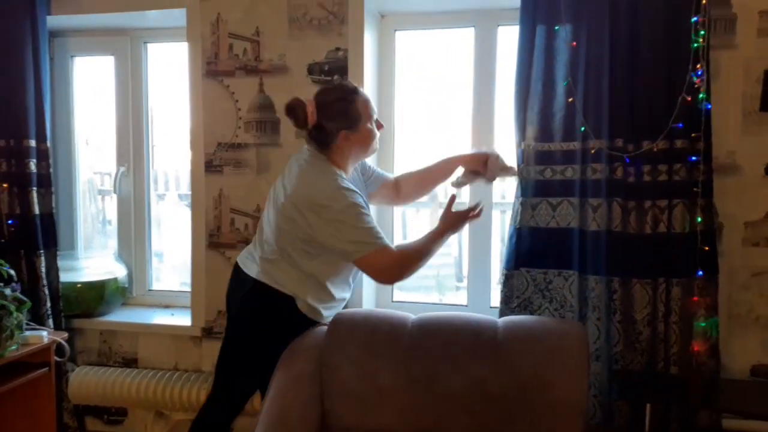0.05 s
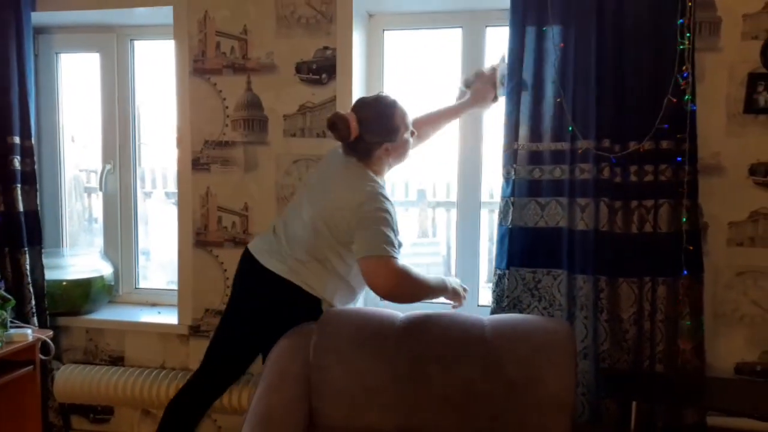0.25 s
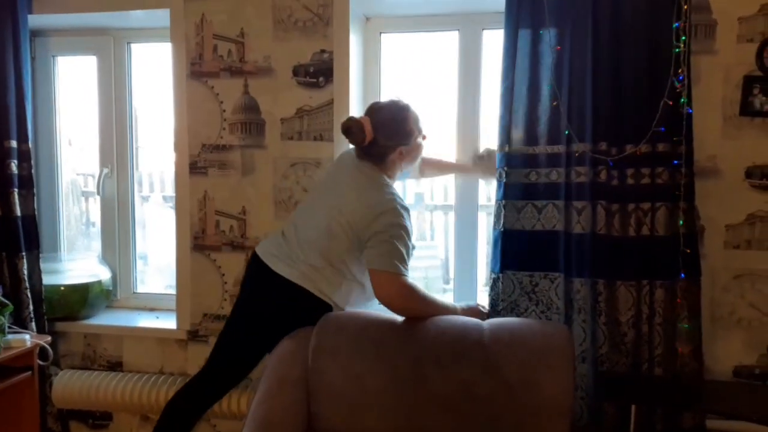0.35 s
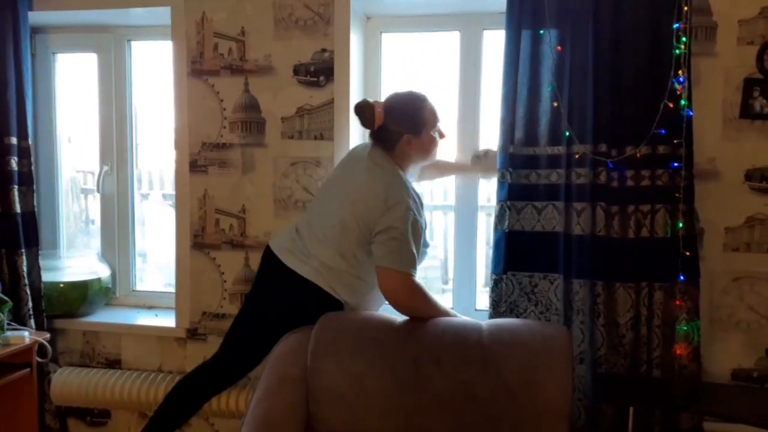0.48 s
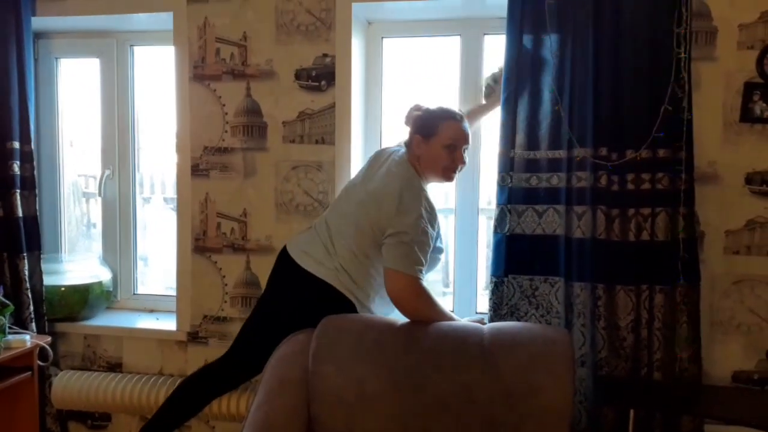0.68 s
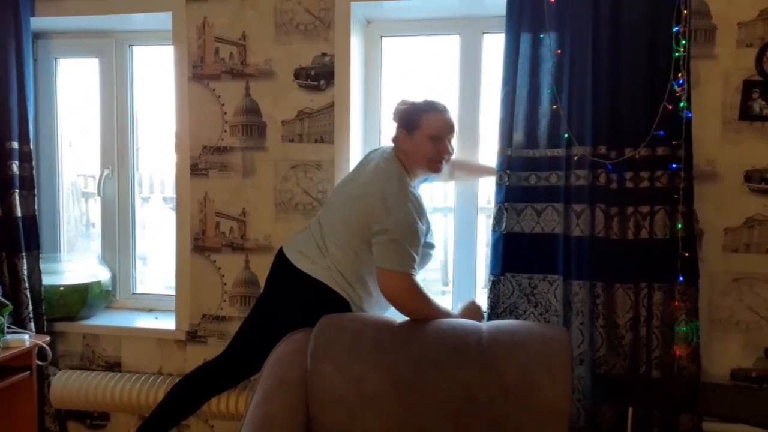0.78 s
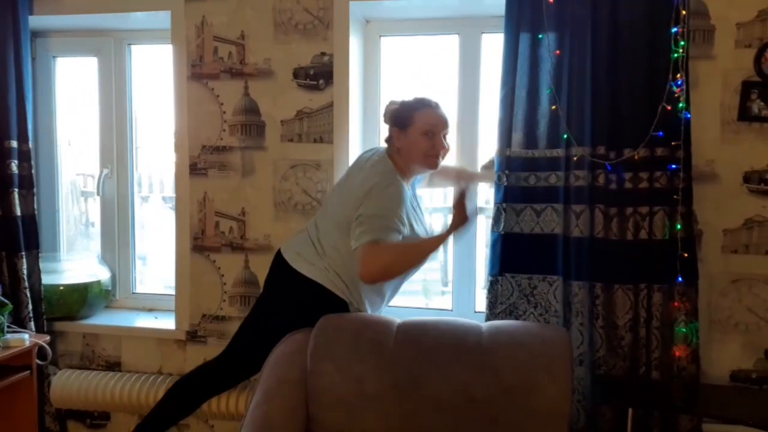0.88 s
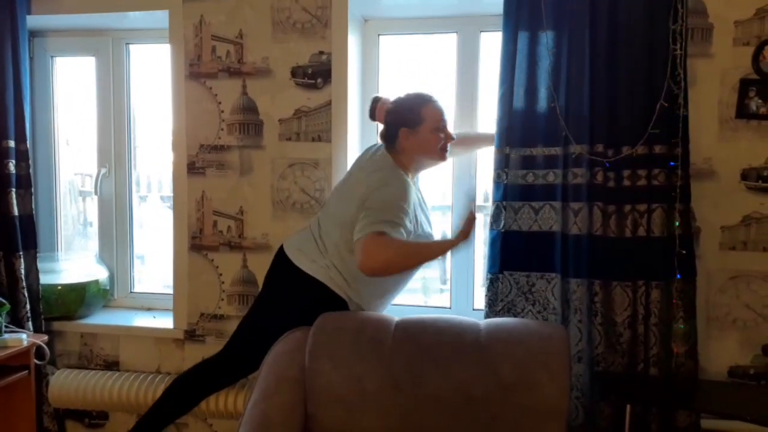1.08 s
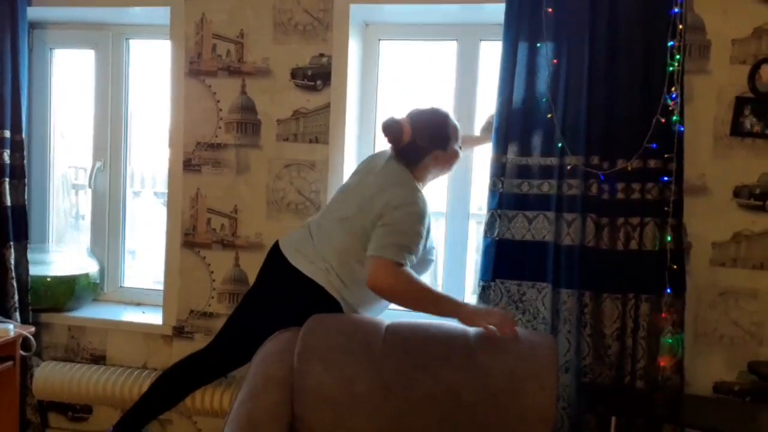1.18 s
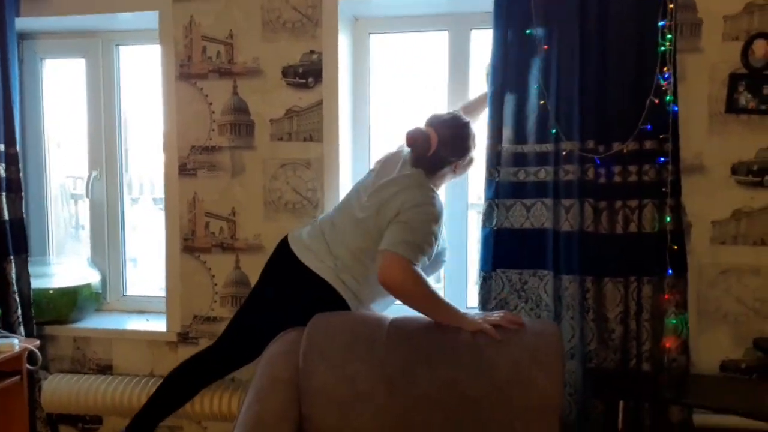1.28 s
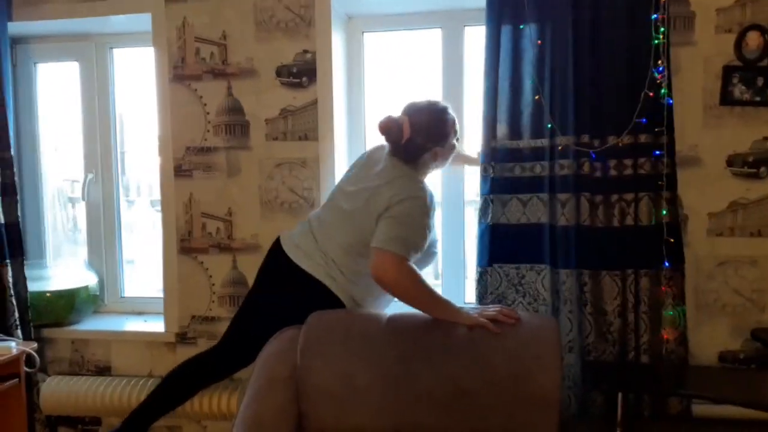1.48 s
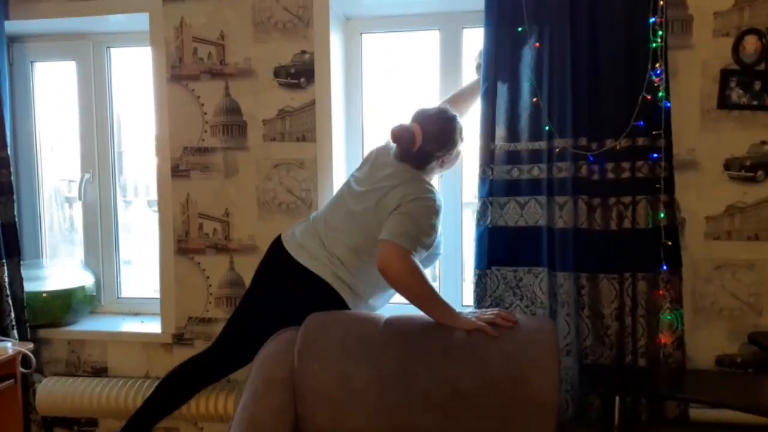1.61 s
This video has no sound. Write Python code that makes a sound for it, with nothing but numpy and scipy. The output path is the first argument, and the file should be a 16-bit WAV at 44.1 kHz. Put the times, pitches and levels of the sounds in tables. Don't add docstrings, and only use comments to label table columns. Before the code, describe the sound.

Crumpled newspaper rubbed hard on window glass in quick strokes, rustling, with short rubbery squeaks

```python
import sys
import numpy as np
from scipy import signal
from scipy.fft import rfft, irfft
from scipy.io import wavfile

SR = 44100
rng = np.random.default_rng(int(sys.argv[2]) if len(sys.argv) > 2 else 0)


def volts(x):
    e = np.asarray(x, float) / 20
    return 10 ** e


def store_wav(level_fs):
    pcm = np.round(np.clip(np.atleast_2d(level_fs), -1, 1) * 32767)
    wavfile.write(sys.argv[1], SR, pcm.T.astype(np.int16))


N = 72765


def at_hz(points, hz):
    f, v = np.transpose(points)
    return np.interp(np.log(hz), np.log(f), v)


def bin_hz():
    return np.maximum(np.fft.rfftfreq(N, 1 / SR), 1)


def rms_one(x):
    return x / np.sqrt(np.mean(x ** 2) + 1e-20)


def drift(rate_hz):
    r = np.exp(-2 * np.pi * rate_hz / SR)
    noise = rng.standard_normal(N + SR)
    return rms_one(signal.lfilter([1], [1, -2 * r, r * r], noise)[SR:])


def colour(x, points):
    return irfft(rfft(x) * volts(at_hz(points, bin_hz())), N)


def swells(rows):
    t = np.arange(N) / SR
    return sum(volts(db) * np.sin(np.interp(t, [start, peak, end], [0, np.pi / 2, 0])) ** 2
               for start, peak, end, db in rows)


def resonance(x, hz, width):
    r = np.exp(-np.pi * width / SR)
    gain = (1 - r * r) * np.sqrt(SR / width / (2 * np.pi))
    return gain * signal.lfilter([1, 0, -1], [1, -2 * r * np.cos(2 * np.pi * hz / SR), r * r], x)


# (frequency [Hz], correlation [-1 to 1])
STEREO_LIKENESS = [(300, 0.85), (700, 0.56), (1400, 0.14), (2800, 1), (6000, -0.084), (12000, 0.42)]


def spread(mid, side):
    likeness = np.clip(at_hz(STEREO_LIKENESS, bin_hz()), -1, 1)
    shared = np.sqrt(1 + likeness) * rfft(mid)
    opposed = np.sqrt(1 - likeness) * rfft(side) * [[1], [-1]]
    return irfft(shared + opposed, N) / np.sqrt(2)


# (frequency [Hz], level [dB per Hz])
ROOM_TONE = [(40, -27), (300, -15.5), (2200, 0), (5000, -9.5), (10000, -17), (15800, -21)]


def room_tone():
    mid, side = (rms_one(colour(rng.standard_normal(N), ROOM_TONE)) for _ in "ms")
    return volts(-68.5) * spread(mid, side)


def friction(clump_db):
    grains_per_s, grain_spread_db, grain_share = 2200, 4, 0.45
    sizes = volts(grain_spread_db * np.minimum(rng.exponential(1, N), 4)) * rng.choice([-1, 1], N)
    clicks = sizes * (rng.random(N) < grains_per_s * volts(clump_db) / SR)
    return np.sqrt(grain_share) * rms_one(clicks) + np.sqrt(1 - grain_share) * rng.standard_normal(N)


# (frequency [Hz], level [dB per Hz])
PAPER_SPECTRUM = [(250, -61), (420, -14), (662, -1.5), (1060, -6), (1270, 0), (1980, -2.5), (5800, -8),
                  (10300, -24), (15800, -19.5)]
# (start [s], peak [s], end [s], rustle level [dB], treble lift [dB])
STROKES = [(-.08, 0.043, .13, -53.5, 3.1), (.1, 0.157, 0.23, -65, -2.1), (0.195, 0.248, .29, -46.5, 1.3),
           (0.247, .3, 0.39, -51, 1.5), (0.34, 0.392, 0.49, -58.5, 1), (0.419, 0.443, 0.52, -55, -4.5),
           (0.468, 0.5, 0.58, -55.5, 0.5), (0.526, 0.625, 0.81, -58.5, 1.5),
           (0.633, 0.709, 0.74, -57.5, -25), (0.731, 0.781, 0.84, -63.5, 4.5),
           (0.787, 0.866, 1.016, -69, -7), (0.949, 1.017, 1.183, -67.5, 1), (1.05, 1.124, 1.17, -59.5, -12),
           (1.126, 1.189, 1.254, -60.5, -12), (1.22, 1.301, 1.338, -52.5, -7),
           (1.298, 1.347, 1.383, -44, 3), (1.348, 1.392, 1.496, -56.5, 4), (1.433, 1.515, 1.62, -67, -13),
           (1.522, 1.613, 1.65, -66, 5.5), (1.593, 1.663, 1.89, -56.5, -1), (0.181, 0.204, 0.22, -61, 4),
           (0.533, 0.555, .6, -67.5, 5)]


def rustle():
    clump_db = 2.6 * drift(40)
    paper = spread(*(rms_one(colour(friction(clump_db), PAPER_SPECTRUM)) for _ in "ms"))
    treble = signal.sosfiltfilt(signal.butter(2, 7000, "high", fs=SR, output="sos"), paper)
    body = swells([row[:4] for row in STROKES]) * (paper - treble)
    air = swells([(start, peak, end, db + lift_db) for start, peak, end, db, lift_db in STROKES]) * treble
    flutter_db = 1.0 * drift(45)
    return volts(8.5 + flutter_db) * (body + air)


# (frequency [Hz], width [Hz], level [dB])
PANE_MODES = [(231.8, 115, -6), (306.7, 67.6, -4), (655, 140, -15), (1193, 170, -14.5)]
# (start [s], peak [s], end [s], hum level [dB])
PUSHES = [(0, .08, 0.14, -57), (.14, .18, 0.26, -54.5), (.19, .24, 0.3, -45.5), (.25, .294, 0.37, -49.5),
          (.41, .445, 0.48, -49), (.46, .49, 0.6, -53), (.595, .614, 0.69, -52), (.74, .77, 0.9, -70.5),
          (.8, .86, 0.87, -66.5), (.981, .995, 1.06, -47), (1.01, 1.04, 1.085, -58),
          (1.095, 1.13, 1.196, -54), (1.2, 1.265, 1.28, -52), (1.28, 1.33, 1.406, -50.5),
          (1.465, 1.485, 1.43, -56), (1.61, 1.635, 1.79, -55)]


def pane():
    pane_db, lump_db, idle_db = 5.5, -0.5, -75.5
    frame_db, frame_lump_db = -73.5, 5.0
    pressure = (swells(PUSHES) + volts(idle_db)) * volts(lump_db * drift(33))
    push = pressure * rng.standard_normal((2, N))
    modes = 0
    for hz, width, db in PANE_MODES:
        ring = resonance(resonance(push, hz, width), hz, 2 * width)
        modes = modes + volts(db) * ring * np.sqrt(width / SR)
    frame = signal.sosfilt(signal.butter(3, 130, fs=SR, output="sos"), rng.standard_normal((2, N)))
    rumble = volts(frame_db + frame_lump_db * drift(20)) * rms_one(frame)
    mid, side = volts(pane_db) * modes + rumble
    return spread(mid, side)


# (time [s], length [s], frequency [Hz], width [Hz], rms level [dB])
SCUFFS = [(.15, 0.021, 2820, 600, -55.5), (0.277, 0.056, 1290, 290, -42), (0.366, 0.035, 1700, 300, -50),
          (0.41, 0.082, 706, 143.5, -48), (0.651, 0.046, 3360, 600, -52), (.685, 0.077, 5110, 629.6, -47.5),
          (1.1, 0.045, 3500, 494, -53), (1.107, 0.041, 6800, 690, -69), (1.158, 0.031, 2400, 397, -57),
          (1.167, 0.034, 2950, 268, -57), (1.17, 0.11, 3630, 470, -60.5), (1.203, 0.049, 1720, 200, -64.5),
          (1.286, 0.03, 4360, 700, -51.5), (1.333, 0.074, 3920, 370.4, -43), (1.369, 0.046, 3500, 460, -43),
          (1.468, .046, 1490, 298, -56), (1.476, 0.051, 760, 199, -59), (1.54, 0.052, 2500, 277.8, -53),
          (1.54, 0.1, 3520, 108, -57.5), (1.575, 0.096, 1720, 330, -55), (1.604, 0.015, 1250, 110, -58.5)]


def scuffs():
    grit = np.array([friction(2.5 * drift(40)) for _ in "ms"])
    out = np.zeros((2, N))
    for s, length, hz, width, db in SCUFFS:
        burst = swells([(s, s + length / 3, s + length, db)]) * grit
        out += resonance(burst, hz, width)
    return spread(*out)


# (time [s], peak level [dB], frequency [Hz], t60 [s])
SNAPS = [(.152, -46, 2890, 0.026), (.196, -43.5, 1760, 0.023), (.205, -50, 12000, 0.0087),
         (.4334, -36, 2520, 0.013), (.7063, -59, 11000, .006), (0.99, -46, 1113, 0.031),
         (1.248, -37.5, 1218, 0.044), (1.272, -50, 15000, .008), (1.3184, -43, 13700, 0.012),
         (1.3414, -39, 11800, 0.0071), (1.351, -36, 694, 0.0078), (1.472, -38, 1092, 0.032),
         (1.5938, -56, 11100, 0.0054), (1.607, -35, 1200, 0.026)]


def snaps():
    out = np.zeros(N)
    for s, peak_db, hz, t60 in SNAPS:
        t = np.maximum(np.arange(N) / SR - s, 0)
        rise = np.tanh(t * hz / 1.5)
        out += volts(peak_db - 60 * t / t60) * rise * np.sin(2 * np.pi * hz * t)
    return out


# (time [s], peak level [dB], frequency [Hz])
BUMPS = [(0.248, -48, 88.5), (0.606, -47.5, 195), (.61, -51, 117), (0.682, -58, 69), (0.986, -40, 238),
         (0.994, -41, 333), (1.01, -42.5, 84), (1.013, -46, 304), (1.233, -48.5, 74.4), (1.279, -41, 138.5),
         (1.354, -47, 81.6), (1.619, -69, 287)]


def bumps():
    out = np.zeros(N)
    for s, peak_db, hz in BUMPS:
        t = np.maximum(np.arange(N) / SR - s, 0)
        out += volts(peak_db) * np.sin(2 * np.pi * hz * t) * np.exp(-t * hz / 1.78)
    return out


def stick_slip(rows, overtones_db, rise):
    jitter_hz, wobble_db, hold = 24, 1.4, 0.97
    out, t = np.zeros(N), np.arange(N) / SR
    jitter, wobble = drift(81), drift(110)
    bend = np.log(.5) / np.log(rise)
    for s, length, start_hz, end_hz, peak_db in rows:
        on = (t >= s) & (t < s + length)
        u = (t[on] - s) / length
        slip_hz = start_hz + (end_hz - start_hz) * u + jitter_hz * jitter[on]
        phase = 2 * np.pi * np.cumsum(slip_hz) / SR
        swell = np.sin(np.pi * u ** bend)
        tone = 0
        for k, db in enumerate(overtones_db):
            bloom = swell ** (k > 0)
            tone = tone + volts(db) * bloom * np.sin((k + 1) * phase + k)
        out[on] += volts(peak_db + wobble_db * wobble[on]) * swell ** hold * tone
    return out


# (time [s], length [s], start pitch [Hz], end pitch [Hz], peak level [dB])
CHIRPS = [
    (.548, .035, 2560, 2520, -50),
    (.662, .026, 3200, 3400, -43),
    (.668, .02, 2250, 2450, -45),
    (.754, .02, 2280, 2230, -49),
    (.836, .035, 4000, 3980, -55),
    (1.055, .025, 1800, 1820, -53),
    (1.284, .022, 2380, 2460, -41),
    (1.288, .02, 4850, 5100, -47),
    (1.358, .012, 3900, 3950, -41),
]


def chirps():
    return stick_slip(CHIRPS, [0], 0.48)


# (time [s], length [s], start pitch [Hz], end pitch [Hz], peak level [dB])
PAD_SQUEAKS = [
    (.653, 0.027, 740, 830, -25),
    (.666, .022, 820.4, 814, -23),
    (.682, 0.018, 810, 791, -23.5),
    (.7, 0.033, 856, 757, -34),
    (1.083, .016, 775, 778, -42),
    (1.281, .025, 809.3, 864.6, -20),
    (1.305, 0.014, 836, 828, -22.5),
    (1.315, .02, 858, 860, -33.5),
]
PAD_OVERTONES = [-5, -13, -26, -40, -20]


def pad_squeaks():
    return stick_slip(PAD_SQUEAKS, PAD_OVERTONES, 0.63)


# (time [s], length [s], start pitch [Hz], end pitch [Hz], peak level [dB])
FOLD_SQUEAKS = [(.66, 0.033, 1545, 1888, -32.5), (.667, 0.029, 1271, 1424, -37),
                (.688, 0.012, 1758, 1885, -28.5), (.705, 0.032, 1800, 1884, -44.5),
                (.835, 0.023, 1706, 1622, -45.5), (.862, 0.02, 1710, 1645, -58.5),
                (1.12, 0.017, 2190, 2210, -41), (1.15, 0.037, 1886, 1947, -36),
                (1.166, .018, 2140, 2240, -39.5), (1.168, 0.014, 1110, 1250, -43.5),
                (1.172, .021, 2430, 2344, -41.5), (1.256, 0.013, 1480, 1480, -46.5),
                (1.27, 0.0098, 2310, 2300, -39.5), (1.288, 0.017, 1576, 1933, -33.5),
                (1.326, 0.025, 1700, 1745, -27.5), (1.344, 0.029, 1585, 1526, -27.5),
                (1.369, 0.025, 1600, 1627, -28), (1.38, 0.014, 1780, 1900, -35),
                (1.398, .027, 1808, 1545, -43.5)]
FOLD_OVERTONES = [0, -29]


def fold_squeaks():
    return stick_slip(FOLD_SQUEAKS, FOLD_OVERTONES, 0.48)


# (time [s], length [s], start pitch [Hz], end pitch [Hz], peak level [dB])
WHISTLES = [
    (1.05, 0.046, 3820, 3850, -39.5),
    (1.085, 0.06, 3870, 3920, -48.5),
]
WHISTLE_OVERTONES = [3.6, -17]


def whistles():
    return stick_slip(WHISTLES, WHISTLE_OVERTONES, 0.48)


# (time [s], length [s], start pitch [Hz], end pitch [Hz], peak level [dB])
GROANS = [
    (1.104, 0.028, 472.4, 454, -33),
    (1.124, 0.016, 424, 379, -37.5),
    (1.138, 0.025, 472, 418, -43),
]
GROAN_OVERTONES = [-1, -8.5, -9, -9.5, -16, -12.5, -14, -18]


def groans():
    return stick_slip(GROANS, GROAN_OVERTONES, 0.48)


def room(x):
    t60_s, level_db = .11, -14
    t = np.arange(int(.4 * SR)) / SR
    tail = rng.standard_normal((2, len(t))) * volts(-60 * t / t60_s) * (t > .003)
    tail = signal.sosfilt(signal.butter(1, 4000, fs=SR, output="sos"), tail)
    tail = tail / np.sqrt(np.sum(tail ** 2, axis=1, keepdims=True))
    return volts(level_db) * signal.fftconvolve(x[None], tail, axes=1)[:, :N]


def scene():
    folds = snaps() + chirps() + fold_squeaks() + whistles()
    pad = pad_squeaks() + groans()
    rasp = 1 + .19 * drift(150)
    n = np.arange(N)
    left = np.interp(n - 1.5, n, folds) + np.interp(n - 3, n, pad)
    direct = rasp * np.array([left, folds + pad])
    tail = room(rasp * (pad + folds))
    return room_tone() + rustle() + pane() + scuffs() + bumps() + direct + tail


def roll_off(x):
    return signal.sosfilt(signal.butter(12, 16610, fs=SR, output="sos"), x)


# (frequency [Hz], left minus right level [dB])
PORT_LEAN = [(100, -3.5), (300, -2.5), (700, -3.5), (3000, -1), (6500, 0.5), (8500, -13), (11000, -5.5),
             (14000, -5)]


def record(dry):
    hz = bin_hz()
    half = volts(at_hz(PORT_LEAN, hz) / 2)
    late = np.exp(-2j * np.pi * hz * 3 / SR)
    ports = np.array([half * late, 1 / half]) * (hz < 15800)
    rumble_cut = signal.butter(2, 45, "high", fs=SR, output="sos")
    mix = signal.sosfilt(rumble_cut, irfft(rfft(dry) * ports, N))
    return roll_off(mix)


dry = scene()
out = record(dry)
store_wav(out)
```